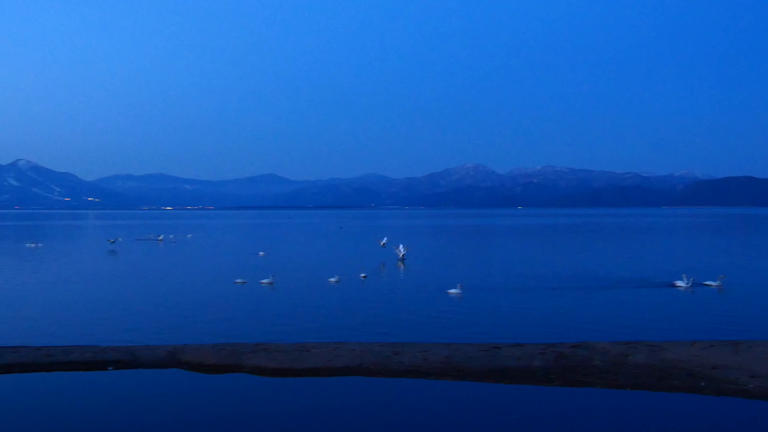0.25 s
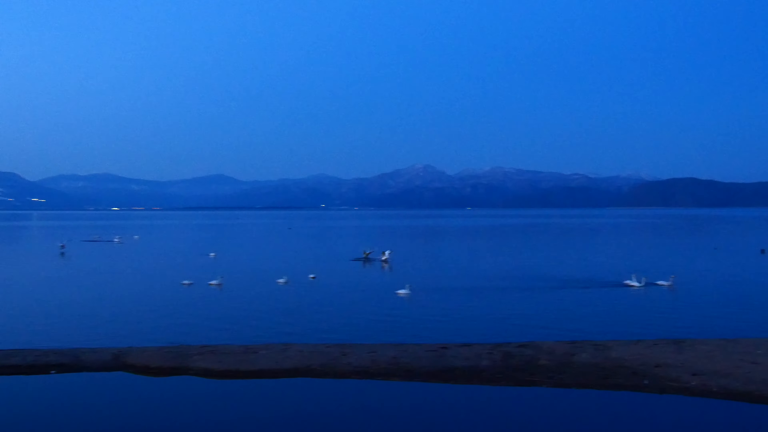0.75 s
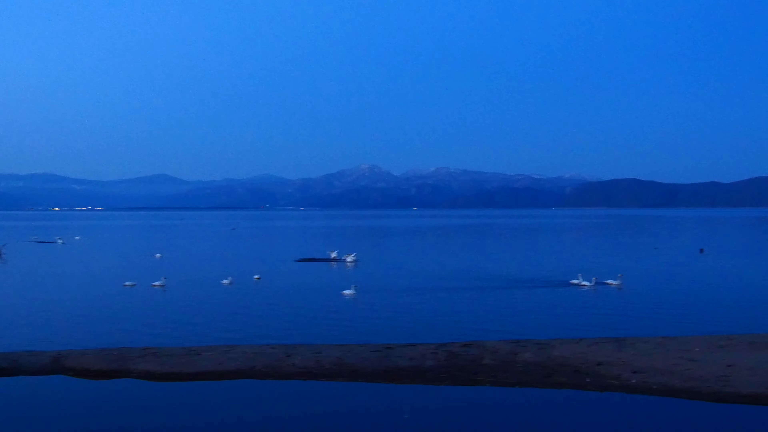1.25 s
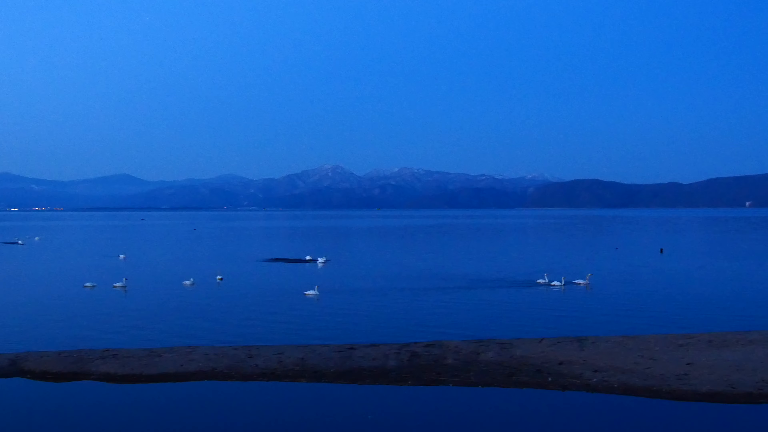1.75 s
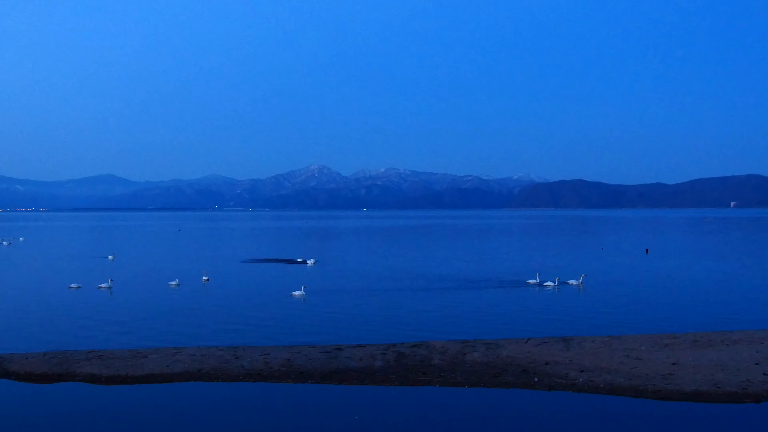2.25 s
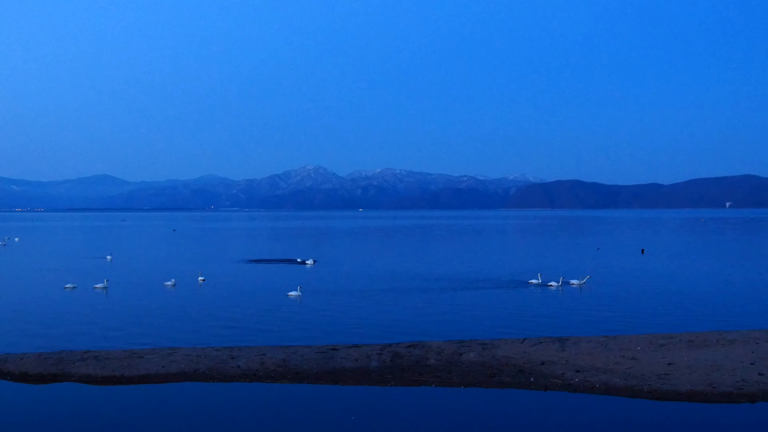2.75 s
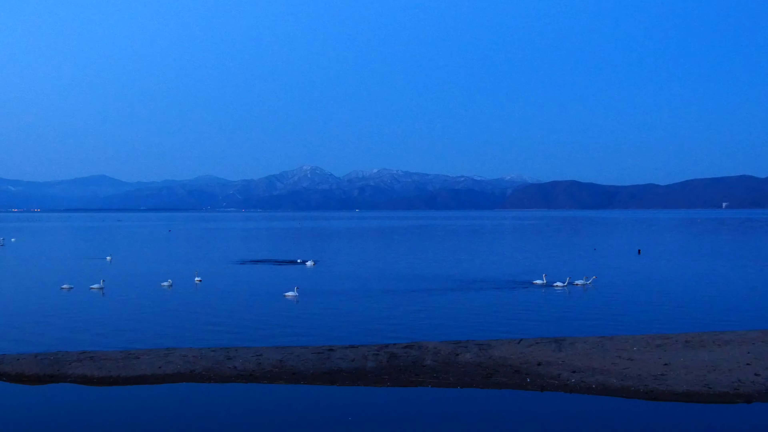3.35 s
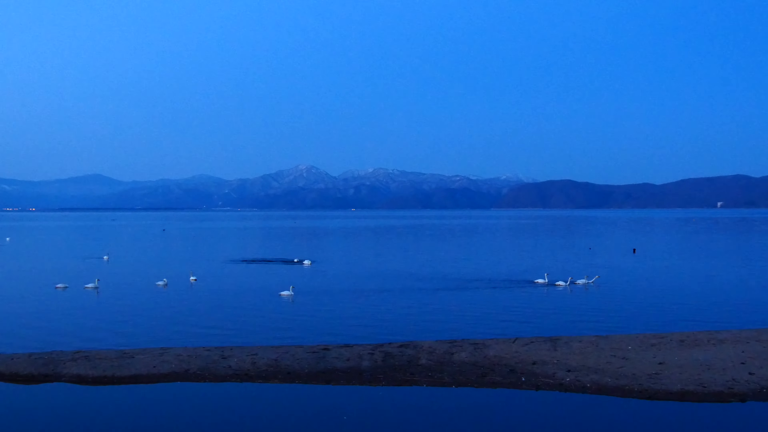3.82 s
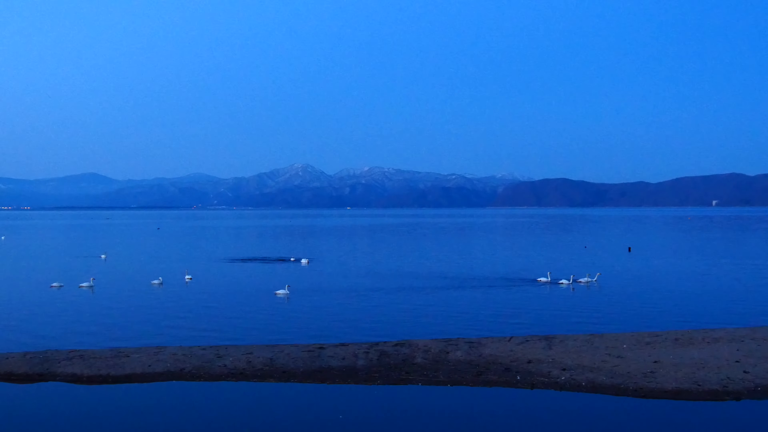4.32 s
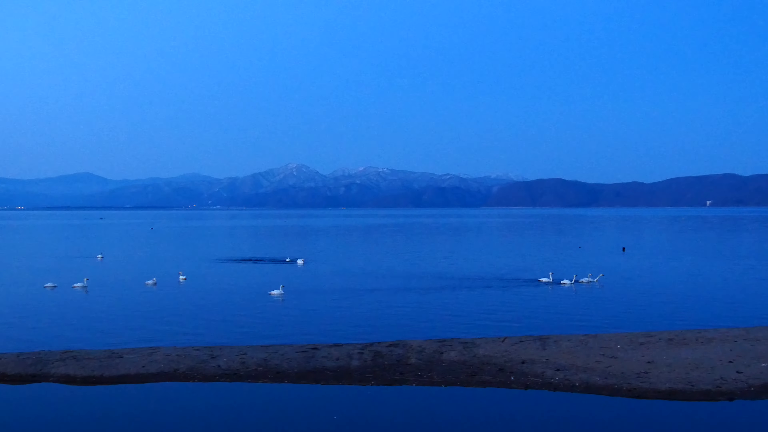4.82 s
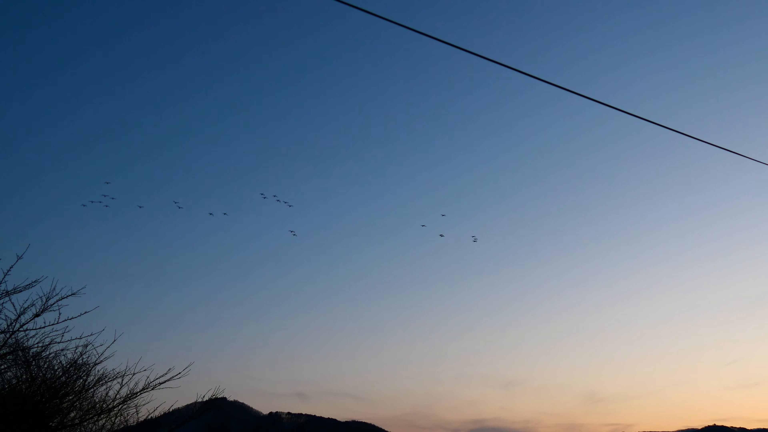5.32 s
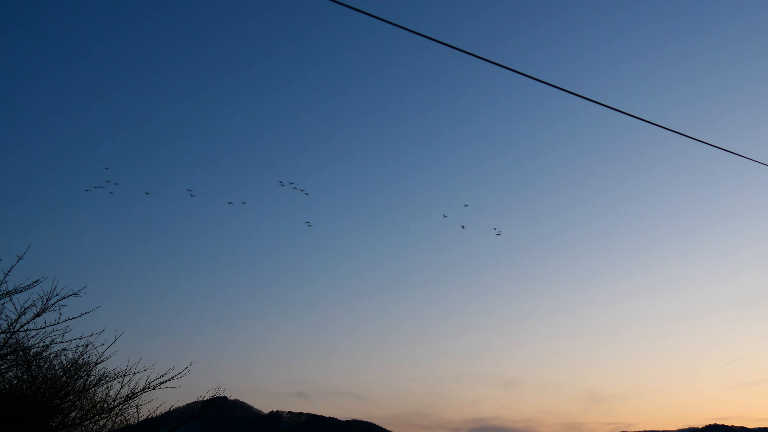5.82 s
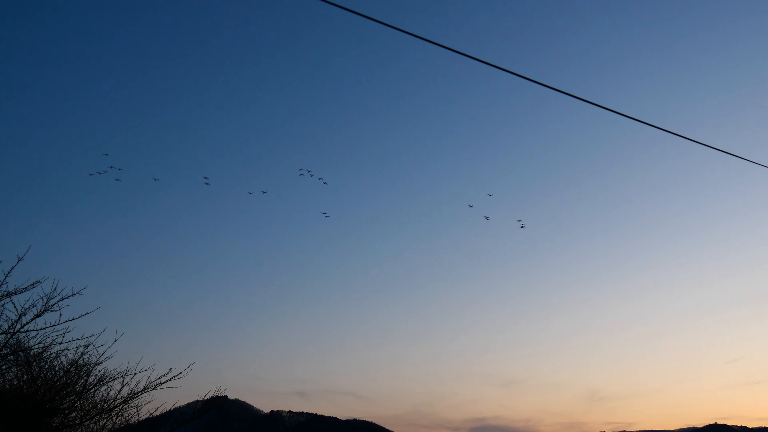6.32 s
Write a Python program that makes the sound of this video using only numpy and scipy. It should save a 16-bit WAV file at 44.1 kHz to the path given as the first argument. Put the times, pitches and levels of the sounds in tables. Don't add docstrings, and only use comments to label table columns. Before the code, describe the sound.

A flock of swans on an open lake trades short barks, trumpet notes and yodelling bugles, voices buzzing and slightly hoarse. One skims in with a soft rush of spray that fades as it settles. Faint far honks and a low hum lie beneath. A click and short silence lead to a quiet hillside with wind puffs on the microphone, dry snaps and a small distant honk.

```python
import sys
import numpy as np
from scipy import signal
from scipy.io import wavfile
from scipy.ndimage import uniform_filter1d

SR = 44100
rng = np.random.default_rng(int(sys.argv[2]) if len(sys.argv) > 2 else 0)


def unload_audio(sound):
    columns = np.transpose(np.atleast_2d(sound))
    steps = np.round(np.clip(columns, -1, 1) * 32767)
    wavfile.write(sys.argv[1], SR, steps.astype(np.int16))


def undo_db(level):
    steps = np.asarray(level, float) / 20
    return 10 ** steps


N = 289737
TIME = np.arange(N) / SR
LAKE_ENDS_S, HILL_STARTS_S = 5.2962, 5.641
WINDPIPE_HZ = 465
THROAT_TOP_HZ, THROAT_DROP_DB_PER_OCT = 2580, 10.5
DULL_BILL_DB, BILL_HISS_DB = -47.5, -19

# (start [s], length [s], pitch [Hz], level [dB], bill resonance [dB])
DEEP_BARKS = [(.443, 0.038, 549, -32, -51), (.472, 0.049, 558, -32, -45), (1.616, 0.075, 553, -36.5, -46),
              (2.955, 0.026, 549, -32, -65), (3.064, 0.058, 533, -33, -52.5), (3.597, 0.01, 572, -37, -53),
              (3.94, 0.042, 545, -32, -61), (4.066, 0.076, 556.7, -36, -44.5),
              (3.895, 0.057, 548, -45, -46), (5.912, 0.024, 590, -43.5, -32)]
BARKS = [(.575, 0.041, 540.5, -32, -45), (1.796, .028, 561, -32, -39), (1.895, 0.029, 546, -33, -43.5),
         (.03, 0.069, 654, -31, -49), (.252, 0.022, 750, -32.5, -37.5), (1.059, 0.088, 651, -31, -31),
         (1.234, 0.083, 653.5, -31, -30), (1.35, 0.019, 679, -37.5, -24), (1.699, 0.021, 728, -34, -23.5),
         (2.125, 0.015, 661, -33.5, -37), (2.591, 0.028, 662.8, -35.5, -39),
         (4.282, 0.016, 663, -34.5, -45), (4.906, 0.032, 662, -35, -33), (3.95, 0.011, 665, -36, -44)]
WHOOPS = [
    (2.355, 0.0335, 657, -40.5, -45),
    (4.303, 0.027, 663, -36.5, -22),
]
HELD = [(.001, 0.025, 853, -39.5, -38), (.162, 0.078, 926.6, -29.5, -35), (1.604, 0.082, 925, -28.5, -27),
        (2.012, 0.012, 667, -36, -48), (2.04, 0.039, 683, -43.5, -45), (3.337, 0.025, 750, -37.5, -44),
        (3.532, 0.034, 835, -35.5, -52), (4.476, 0.026, 629, -37, -39), (3.856, 0.024, 815, -44, -57.5),
        (3.895, 0.017, 782, -44, -56), (4.996, .052, 548, -34.5, -48)]
MELLOW = [
    (3.829, 0.02, 588.5, -29.5, -51),
    (3.85, 0.057, 659, -36, -48),
    (4.075, 0.057, 658, -36.5, -47),
    (4.672, .064, 656, -32.5, -42),
    (5.056, 0.072, 652, -34, -36),
]
CLIMBS = [
    (4.495, 0.047, 745, -29, -51),
]

# (start [s], length [s], pitch [Hz], level [dB])
DULL_NOTES = [(0.65, 0.039, 780, -45.5), (3.939, 0.012, 738, -35), (4.057, .012, 720, -36.5),
              (4.068, 0.035, 815, -36.5), (4.282, 0.035, 797, -36.5), (4.474, 0.026, 795, -34),
              (4.674, 0.055, 800, -43), (5.055, 0.033, 769, -33), (4.06, 0.04, 990, -49),
              (3.9, 0.038, 830, -51), (4.1, 0.041, 840, -49.5), (4.688, .022, 510, -45.5),
              (4.425, .01, 706, -34.5), (5.209, 0.049, 520, -35), (5.745, 0.047, 617, -59),
              (5.96, 0.035, 650, -60), (3.062, 0.0087, 570, -33), (5.9, 0.016, 670, -47),
              (.572, 0.0069, 630, -40.5), (2.1, .05, 600, -38.5), (.42, 0.016, 740, -47),
              (.25, .045, 850, -48.5)]
YIPS = [
    (1.348, 0.028, 840, -45),
    (3.7, 0.0073, 663.3, -35.5),
    (4.425, 0.006, 903, -34),
    (5.906, 0.0036, 823, -42.5),
]
SLIDES = [
    (.137, 0.019, 874, -24),
    (1.587, 0.019, 927, -25.5),
    (4.585, 0.05, 742, -45.5),
    (5.15, 0.056, 581, -41),
]
MURMURS = [(.001, 0.028, 564, -42.5), (.064, 0.062, 548.3, -38.5), (.703, 0.071, 553, -52),
           (1.87, 0.015, 500, -44.5), (2.604, 0.036, 540, -43.5), (2.84, 0.017, 500, -50.5),
           (2.917, 0.016, 565, -43), (3.236, 0.03, 550, -43), (4.285, 0.055, 527, -48),
           (3.018, 0.058, 550, -45.5), (4.525, 0.036, 528, -40), (4.565, 0.011, 550, -43.5),
           (.985, 0.077, 499, -50.5), (1.17, 0.083, 502.5, -50), (2.803, 0.013, 541.8, -45),
           (4.95, 0.029, 548, -50.5)]
REEDY = [
    (3.4, 0.02, 860, -54),
    (3.12, 0.088, 550, -63),
    (4.175, 0.04, 555, -59),
    (4.335, 0.02, 510, -58.5),
    (3.968, 0.014, 500, -47),
]

# (share of length, pitch ratio, level [dB])
DEEP_SHAPE = [(0, 0.93, 0), (.15, 1.01, 1.5), (.7, .995, -2), (1.001, 0.87, -8.5)]
BARK_SHAPE = [(0, 1.07, 2.5), (.2, .99, 0.6), (0.651, 1.0, -0.5), (1, .93, -5)]
WHOOP_SHAPE = [(0, .92, 1), (0.349, 1, -2), (0.601, 1.0, 4.5), (1.001, .87, -6)]
NOTE_SHAPE = [(0, .99, 0), (.15, 1, 0), (.85, 1, 0), (1, .975, -2)]
DULL_SHAPE = [(0, 1.015, 2), (.5, 1, 0), (1, .975, -4)]
YIP_SHAPE = [(0, 0.918, 4), (1.001, .82, -9.5)]
SLIDE_SHAPE = [(0, .8, -2.5), (0.399, .89, -5.5), (1, 0.95, -5)]
MURMUR_SHAPE = [(0, 1.02, 2.5), (1, .98, -1.5)]
CLIMB_SHAPE = [(0, .83, -4), (.45, 0.97, 1), (0.748, .995, -2.5), (1.2, 1.06, -12)]

# (calls, shape, second harmonic [dB], overtone loss [dB/octave])
VOICES = [
    (DEEP_BARKS, DEEP_SHAPE, -10.5, 13.2),
    (BARKS, BARK_SHAPE, -14, 15),
    (WHOOPS, WHOOP_SHAPE, -13.5, 27),
    (HELD, NOTE_SHAPE, -17, 9),
    (DULL_NOTES, DULL_SHAPE, -18, 36),
    (YIPS, YIP_SHAPE, -15, 36),
    (SLIDES, SLIDE_SHAPE, -15, 6.6),
    (MURMURS, MURMUR_SHAPE, -5.5, 16),
    (REEDY, MURMUR_SHAPE, 3.9, 23),
    (CLIMBS, CLIMB_SHAPE, -12.5, 8),
    (MELLOW, NOTE_SHAPE, -15, 25),
]

# (time [s], pitch [Hz], level [dB])
YODELS = [
    [(.744,663,-33),(.768,660,-41),(.785,665,-30),(.81,675,-32.5)],
    [(.822,738,-31),(.83,730,-31),(.853,735,-29),(.866,628,-32),(.882,627,-32),(.9,714,-28.5),(.915,716,-30),(.94,683,-31),(.975,611,-38)],
    [(1.968,560,-54),(2.0,561,-35),(2.012,537,-39),(2.03,574.4,-30),(2.05,522,-35.5),(2.09,531.5,-39),(2.12,545,-41),(2.153,556,-30.5),(2.162,585,-32.5)],
    [(2.168,640,-29.5),(2.178,650,-30),(2.192,634,-29.5),(2.21,623,-29),(2.218,553,-32),(2.238,559,-32.5)],
    [(2.245,651,-31),(2.258,686,-28),(2.268,657,-27.5),(2.283,657,-29.5),(2.295,746,-26),(2.31,793,-28),(2.32,757,-33),(2.33,784,-27.5),(2.344,705,-26)],
    [(3.235,675,-38),(3.26,655,-36),(3.278,661,-28),(3.3,764,-31),(3.31,798,-30.5),(3.322,757,-36)],
    [(4.75,420,-50.5),(4.785,566,-42.5),(4.818,693,-43.5)],
    [(4.815,700,-39),(4.826,715,-29),(4.86,860,-34),(4.88,862,-29),(4.9,888,-45.5),(4.925,907,-47.5),(4.945,811,-43.5)],
    [(4.825,559,-40),(4.842,571,-31.5),(4.862,563,-33),(4.88,532,-36.5),(4.905,529,-39)],
    [(5.087,570,-33),(5.1,586,-29.5),(5.108,563,-28.5),(5.116,544,-38.5)],
]
# (time [s], pitch [Hz], level [dB], bill opening [dB])
BUGLES = [
    [(.146,643,-30,-13.5),(.171,663,-27,1),(.179,734,-27.5,-10),(.19,765,-30,-22),(.21,718,-28.5,-23),(.243,633,-37,-22)],
    [(.288,645,-31,-17),(.308,639,-30.5,-7.5),(.32,662,-28,4),(.332,671,-27,-3.5),(.343,644,-30,-9),(.37,589.5,-38.5,-15)],
    [(2.637,646,-31.5,-15),(2.66,664,-31.5,-9.5),(2.672,630,-35.5,-11),(2.683,650,-34,-13),(2.715,628,-33,-1.5),(2.74,718.5,-27,-7.5),(2.762,736,-28.5,-4),(2.79,720,-30,-12),(2.832,644,-35.5,-12)],
    [(3.325,653,-30.5,-17),(3.345,636.5,-33.5,-13),(3.365,649,-31,-13),(3.382,635,-28,-2.5),(3.398,682,-26,-1),(3.41,748,-30.5,-6.5),(3.42,741,-26,-9.5),(3.44,710,-31,-10),(3.462,637,-38.5,-19.5)],
    [(3.518,660,-33,-5.5),(3.525,643,-29,-1),(3.55,651.6,-28.5,0),(3.562,694,-29,-9),(3.575,725,-29,-10.5),(3.6,676,-40.5,-12)],
    [(5.207,654,-30,-14.5),(5.22,695,-30.5,-6.5),(5.24,712,-31,-3.5),(5.253,717,-29.5,-1.5),(5.265,689.4,-29,-8.5),(5.295,608,-31,-22)],
    [(3.405,520,-47,0),(3.43,485,-45,0),(3.47,470,-47,0),(3.5,510,-52,0)],
]
# (second harmonic [dB], bill resonance [dB], overtone loss [dB/octave])
PHRASE_COLOURS = [(-16.5,-35,17),(-24,-33.5,24),(-9,-42.5,9.5),(-13.5,-30.5,8),(-14.5,-36.5,7),(-19.5,-32.5,17.5),(0.5,-44,24.5),(-18,-38.5,20),(-5.5,-33,11),(-15.5,-33,20),
                  (-19.5,-17.5,13.5),(-16,-20,15),(-21.5,-18,14.5),(-20,-23,17),(-18.5,-21,15),(-16.5,-22,19),(-14,-40,20)]
# (time [s], rasp [dB])
RASP = [(0, -27), (2.28, -19.5), (2.35, -9), (2.6, -23.5), (3.25, -11.5), (3.5, -31), (4.0, -19.5),
        (5.3, -16.5)]

# (time [s], level [dB])
SKIM = [
    (0, -69),
    (.46, -72),
    (.5, -58.5),
    (1.2, -61.5),
    (1.27, -58),
    (2.0, -65),
    (2.35, -68.5),
    (2.6, -74),
    (3.4, -100),
]
# (frequency [Hz], level [dB/Hz])
SPRAY = [(180, -34), (300, -6.5), (1000, -0.5), (2060, -9.5), (4400, -10), (5750, -26.5), (8500, -22),
         (11000, -52), (15000, -64.5)]
# (frequency [Hz], level [dB])
HUM = [(29, -80.5), (70, -70), (117, -76.5), (187, -74.5)]
# (frequency [Hz], level [dB/Hz])
LAKE = [(20, -23), (70, -16), (113, -9.5), (300, -13.5), (700, -9), (1500, -27), (3200, -25.5),
        (4800, -34.5), (15000, -39.5)]
# (frequency [Hz], likeness [0-1])
LIKENESS = [(30, 1), (150, 0.66), (600, 0.64), (4000, 0.68), (12000, 0.36)]
# (start [s], length [s], level [dB])
CROAKS = [(2.132, .012, -46), (2.296, .045, -40), (2.964, .012, -49), (3.012, .014, -53),
          (3.212, .016, -45), (3.94, .014, -48), (4.058, .03, -41), (4.286, .02, -48), (4.421, .01, -44),
          (4.481, .02, -44), (4.679, .015, -47), (4.826, .03, -39), (4.919, .025, -46), (5.046, .015, -44),
          (5.903, .01, -62)]
# (frequency [Hz], width [Hz], level [dB])
CROAK_THROAT = [(850, 280, 5), (1457, 250, -2.5), (2270, 700, -10), (3960, 1000, -21)]
# (time [s], centre [Hz], level [dB])
DRIPS = [
    (2.72, 4900, -53),
    (2.811, 7460, -55),
    (2.844, 3500, -45.5),
    (3.637, 4190, -51),
    (4.189, 3300, -43.5),
]
# (time [s], level [dB])
PUFFS = [
    (5.65, -56),
    (5.72, -57),
    (5.8, -60),
    (5.9, -73),
    (6.53, -61),
]
# (time [s], body [dB], edge [dB])
TICKS = [(5.689,-50,-46.5),(5.693,-46,-49),(5.7302,-52,-45.5),(5.738,-46.5,-52.5),(5.748,-52,-56),(5.7546,-52,-44.5),(5.8732,-52,-47.5),
         (5.881,-46,-45),(5.989,-50,-56),(6.0062,-61,-46.5),(6.0112,-49.5,-55)]
# (frequency [Hz], level [dB/Hz])
HILL = [(20, -24), (120, -3), (300, -6.5), (680, -4.5), (1200, -14), (2200, -21.5), (4000, -25),
        (15000, -28)]


def curve(rows):
    return undo_db(np.interp(TIME, *np.transpose(rows)))


def at_hz(points, hz):
    table_hz, value = np.transpose(points)
    return np.interp(np.log(hz), np.log(table_hz), value)


def rms_one(x):
    return x / np.sqrt(np.mean(x ** 2) + 1e-20)


def band(x, low_hz, high_hz):
    return signal.sosfilt(signal.butter(2, [low_hz, high_hz], "band", fs=SR, output="sos"), x)


def drift(rate_hz):
    knots = rng.standard_normal(int(N / SR * 400) + 2)
    return np.interp(TIME * min(rate_hz, 190) * 2, np.arange(len(knots)), knots)


def banded_noise(spectrum, patchy_db):
    out, together = 0, drift(2.5)
    edges_hz = 18 * 2 ** np.arange(0, 10.1, .5)
    white = rng.standard_normal((2, 2, N))
    for k, (low_hz, high_hz) in enumerate(zip(edges_hz, edges_hz[1:])):
        centre_hz = np.sqrt(low_hz * high_hz)
        mid, side = band(white[k % 2], low_hz, high_hz)
        alike = np.clip(at_hz(LIKENESS, centre_hz), 0, 1)
        flicker_db = patchy_db * (0.78 * together + drift(17))
        gain = undo_db(at_hz(spectrum, centre_hz) + flicker_db)
        out = out + gain * (np.sqrt(1 + alike) * mid + np.sqrt(1 - alike) * side * [[1], [-1]])
    return rms_one(out)


def echoes(x, t60_s, length_s, cut_hz):
    t = np.arange(int(length_s * SR)) / SR
    shared, own = rng.standard_normal(len(t)), rng.standard_normal((2, len(t)))
    dull = signal.butter(1, cut_hz, fs=SR, output="sos")
    tail = signal.sosfilt(dull, shared + 2.9 * own) * undo_db(-60 * t / t60_s)
    return signal.fftconvolve(x, tail / np.sqrt(np.sum(tail ** 2) / 2), axes=1)[:, :N]


def throat():
    white = rng.standard_normal(N)
    air = band(white, 619, 908) + undo_db(-14.0) * band(white, 1400, 1910)
    return np.array([drift(60), drift(120), curve(RASP), rms_one(air), rms_one(band(white, 3100, 6000))])


def overtone_gains(order, pitch, effort_db, second_db, bill_db, fall_db, luck):
    hz = order * pitch
    throat_loss_db = THROAT_DROP_DB_PER_OCT * np.maximum(np.log2(hz / THROAT_TOP_HZ), 0)
    source = undo_db(second_db - fall_db * np.log2(order / 2) - throat_loss_db)
    bill = undo_db(bill_db + 0.88 * effort_db) * np.exp(-((hz - 4450) / 800) ** 2)
    top_loss_db = 20 * np.clip(hz / 4900 - 1, 0, 2)
    gains = (source + bill) * undo_db(1.44 * luck[:13, None] + 0.18 * effort_db - top_loss_db)
    knots = rng.standard_normal((13, 40))
    since_s = np.arange(len(pitch)) / SR
    turning = np.array([np.interp(since_s / .02, np.arange(40), k) for k in knots])
    gains = gains * undo_db(.6 * np.minimum(order, 5) * (turning - .5))
    glide_per_s = np.abs(np.gradient(np.log(pitch))) * SR
    return gains * undo_db(-order * glide_per_s * .13)


def add_honk(out, rows, second_db, bill_db, cords, fall_db=13.0):
    s, hz, level_db, *opening_db = np.transpose(rows)
    rise_s, fall_s = .003, .011
    span = slice(max(int((s[0] - rise_s) * SR), 0), min(int((s[-1] + 4 * fall_s) * SR), N))
    t, luck = TIME[span], rng.standard_normal(16)
    waver, shimmer, rasp, air, hiss = cords[:, span]
    since_s, after_s = t - s[0], np.maximum(t - s[-1], 0)

    pitch = uniform_filter1d(np.interp(t, s, hz), size=300) * (1 + .0035 * waver)
    pitch *= 1 - 1.8 * after_s
    phase = 2 * np.pi * np.cumsum(pitch) / SR
    level_db = 20 * np.log10(np.interp(t, s, undo_db(level_db)))
    bill_db = bill_db + (np.interp(t, s, opening_db[0]) if opening_db else 0)

    order = np.arange(2, 15)[:, None]
    over = overtone_gains(order, pitch, level_db - level_db.max(), second_db, bill_db, fall_db, luck)
    flutter = 1 + rasp * np.roll(shimmer, len(t) // 2) * np.sqrt(order)
    tone = np.sin(phase + luck[13])
    tone += np.sum(over * flutter * np.sin(order * (phase + luck[14])), axis=0)
    tone += rasp * air * (0.65 + 0.38 * np.exp(-np.maximum(since_s, 0) / 0.024))
    tone += undo_db(bill_db + BILL_HISS_DB + 7.9 * waver) * hiss

    edges = np.clip(since_s / rise_s + 1, 0, 1) * np.exp(-after_s / fall_s)
    voice = np.sqrt(2) * undo_db(level_db + 0.81 * shimmer) * edges * tone
    out[0, span] += voice * undo_db(.8 + .4 * luck[15])
    out[1, span] += np.roll(voice, round(.8 * luck[12])) * undo_db(-.7 - .4 * luck[15])


def near_swans():
    out, cords = np.zeros((2, N)), throat()
    for calls, shape, second_db, fall_db in VOICES:
        for start_s, length_s, hz, level_db, *bill_db in calls:
            rows = [(start_s + share * length_s, ratio * hz, level_db + db) for share, ratio, db in shape]
            add_honk(out, rows, second_db, (bill_db or [DULL_BILL_DB])[0], cords, fall_db)
    for rows, (second_db, bill_db, fall_db) in zip(YODELS + BUGLES, PHRASE_COLOURS):
        add_honk(out, rows, second_db, bill_db, cords, fall_db)
    return signal.sosfilt(signal.butter(4, WINDPIPE_HZ, "high", fs=SR, output="sos"), out)


def far_flock(count):
    out, cords = np.zeros((2, N)), throat()
    for start, long, high, loud in rng.random((count, 4)):
        s, length_s = start * N / SR, 0.024 + 0.0828 * long
        hz, level_db = 560 + 260 * high, -12 * loud
        rows = [(s, .93 * hz, level_db), (s + length_s / 2, hz, level_db),
                (s + length_s, .9 * hz, level_db - 17.5)]
        add_honk(out, rows, -16.0, -50.0, cords)
    return rms_one(0.14 * out + echoes(out, t60_s=0.35, length_s=0.49, cut_hz=6600))


def skim():
    return curve(SKIM) * undo_db(13.0) * banded_noise(SPRAY, patchy_db=.8)


def hum():
    white = rng.standard_normal(N)
    return sum(undo_db(db) * rms_one(band(white, hz - 5.0, hz + 5.8)) for hz, db in HUM)


def lake_air():
    return undo_db(-56.5) * banded_noise(LAKE, patchy_db=1.0)


def croaks():
    slaps_per_s = 530
    slaps = (rng.random(N) < slaps_per_s / SR) * rng.uniform(0.36, 1, N)
    slaps += 0.026 * rng.standard_normal(N)
    rings = [undo_db(db) * band(slaps, hz - width / 2, hz + width / 2) for hz, width, db in CROAK_THROAT]
    s, length_s, level_db = np.transpose(CROAKS)[:, :, None]
    attack = np.clip((TIME - s) / 0.0019, 0, 1)
    decay = np.exp(-np.maximum(TIME - s - length_s / 2, 0) / length_s)
    return rms_one(sum(rings)) * (undo_db(level_db) * attack * decay).sum(axis=0)


def drips():
    out, decay_s = np.zeros((2, N)), .005
    for s, hz, level_db in DRIPS:
        puff = rng.standard_normal(1500) * np.exp(-np.arange(1500) / SR / decay_s)
        at = round(s * SR)
        out[:, at:at + len(puff)] += undo_db(level_db) * band(puff, hz / np.sqrt(2), hz * np.sqrt(2))
    return out


def wind():
    rise_s, decay_s, calm_db = 0.023, 0.073, -68.5
    s, level_db = np.transpose(PUFFS)[:, :, None]
    puffs = undo_db(level_db) * np.exp(np.minimum((TIME - s) / rise_s, (s - TIME) / decay_s))
    return (undo_db(calm_db) + puffs.sum(axis=0)) * rms_one(band(rng.standard_normal(N), 14.28, 42))


def ticks():
    body_s, edge_s, rustle_s, rustle_db = 0.0012, 0.00068, 0.078, -13.5
    out, t = np.zeros((3, 2, N + 4000)), np.arange(4000) / SR
    for s, body_db, edge_db in TICKS:
        sides = undo_db(2.5 * rng.standard_normal((2, 1)))
        shapes = np.array([undo_db(body_db) * np.exp(-t / body_s),
                           undo_db(edge_db) * np.exp(-t / edge_s),
                           undo_db(body_db + rustle_db) * np.exp(-t / rustle_s)])
        at = round(s * SR)
        out[:, :, at:at + len(t)] += (shapes * rng.standard_normal((3, len(t))))[:, None] * sides
    body = undo_db(6.0) * band(out[0], 2030, 4450)
    edge = band(out[1], 7000, 13000)
    rustle = undo_db(5.5) * band(out[2], 1800, 2400)
    return (body + edge + rustle)[:, :N]


def hill_air():
    return undo_db(-61.0) * banded_noise(HILL, patchy_db=.5)


def scene():
    swans, flock = near_swans() + croaks(), far_flock(count=110)
    swans = swans + undo_db(-23) * echoes(swans, t60_s=.6, length_s=.35, cut_hz=1500)
    lake = skim() + drips() + hum() + lake_air() + undo_db(-53.5) * flock
    hill = ticks() + wind() + hill_air() + undo_db(-65.0) * flock
    return swans + np.where(TIME < LAKE_ENDS_S, lake, hill)


def low_pass(x):
    return signal.sosfilt(signal.butter(12, 15730, fs=SR, output="sos"), x)


def record(dry):
    dry = dry * ((TIME < LAKE_ENDS_S) + np.clip((TIME - HILL_STARTS_S) / 0.0009, 0, 1))
    dry[:, round(LAKE_ENDS_S * SR)] += undo_db(-28.5)
    ambience = band(echoes(dry, t60_s=0.28, length_s=.112, cut_hz=7000), 220, 1700)
    wet = dry + undo_db(-16.5) * ambience
    wet = signal.sosfilt(signal.cheby2(10, 40, 16000, fs=SR, output="sos"), wet)
    return low_pass(wet)


dry = scene()
out = record(dry)
unload_audio(out)
```